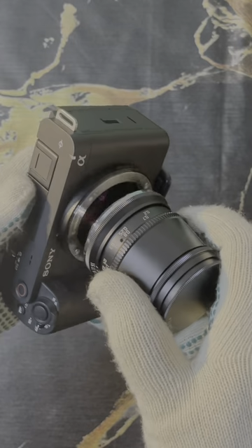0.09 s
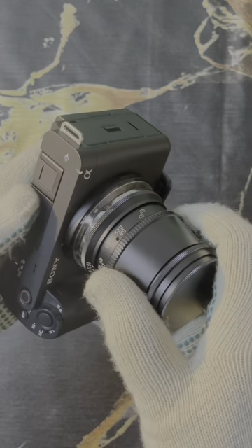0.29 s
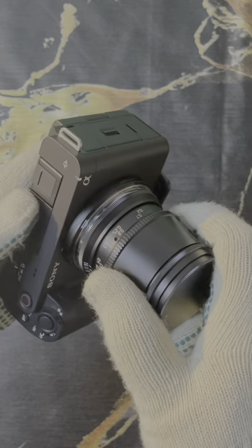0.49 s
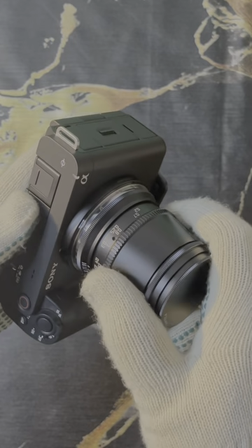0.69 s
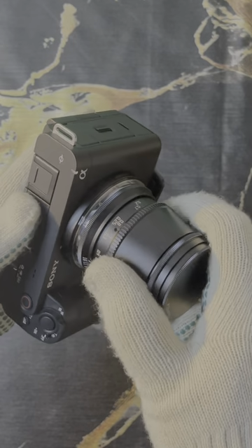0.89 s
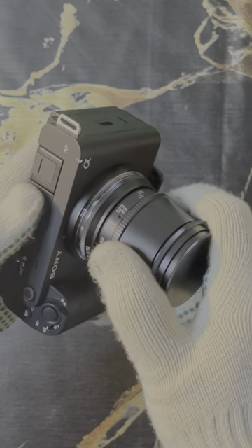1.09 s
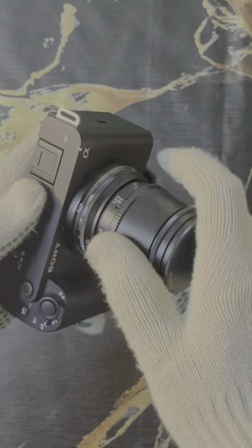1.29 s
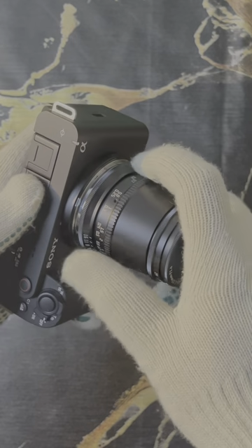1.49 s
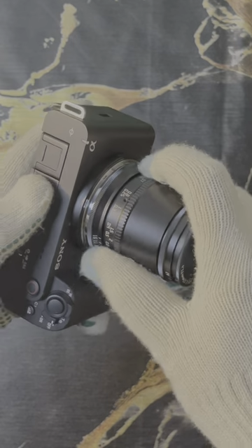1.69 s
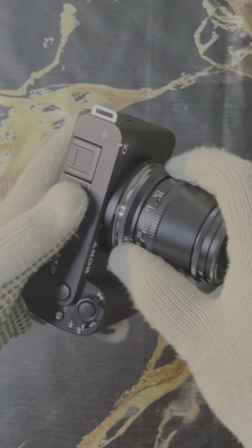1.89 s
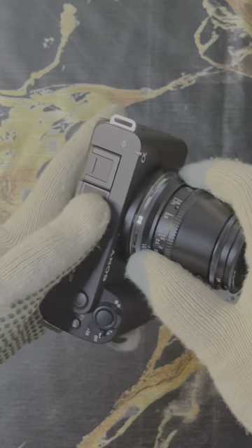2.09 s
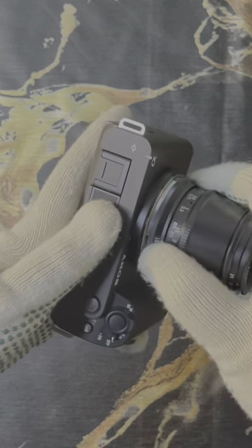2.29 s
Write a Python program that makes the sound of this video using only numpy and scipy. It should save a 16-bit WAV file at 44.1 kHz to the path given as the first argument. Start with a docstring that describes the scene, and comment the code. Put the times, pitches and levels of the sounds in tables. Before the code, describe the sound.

Lens mount clicks, close up: soft rubbing leads into quick hard knocks, then a quiet gap, a softer click pair with a short scrape, and faint closing taps, over unsteady low hum and faint hiss indoors.

```python
"""A low swaying hum and a hiss come first, with a brief glove rub; knocks and clicks soon follow.
Gloved hands seat and twist a metal lens on a camera body, close to a pair of microphones.
Each blow excites damped modes of mount and body and a broad crack; each rub is granular friction noise.
A small room answers with decaying random taps; hum and hiss are shaped noise, partly alike in both channels."""
import sys
import numpy as np
from scipy import signal
from scipy.fft import rfft, irfft
from scipy.io import wavfile
from scipy.ndimage import uniform_filter1d

SR = 44100
rng = np.random.default_rng(int(sys.argv[2]) if len(sys.argv) > 2 else 0)


def inscribe(sig):
    """Save sig as 16-bit PCM at rate SR to the path in sys.argv[1].

    A 1-D sig is mono; a 2-D sig holds one channel per row.
    Samples are clipped to [-1, 1] before scaling.
    """
    pcm = np.round(np.clip(np.atleast_2d(sig).T, -1, 1) * 32767)
    wavfile.write(sys.argv[1], SR, pcm.astype(np.int16))


N = 105840  # samples

HUM_DB, HISS_DB = -53.5, -78  # RMS over both channels, ahead of the final filters
GRAINS_PER_S = 3600  # mean rate of friction grains
GRAIN_DB = -5.5  # scale of the exponential spread of grain levels
WHISTLE_OCT, FAVOUR_OCT = 0.14, 0.066  # widths of the favoured bands of rubs and blows, octaves
ROOM_DB, ROOM_RIGHT_DB = -1.5, 1.5  # room gain; extra on the right
ROOM_GAP_S = 0.0035  # silence ahead of the first room tap
ROOM_SAME = 0.15  # share of the room taps that both channels hear alike
HIT_DB, CRACK_DB = -4.5, 10  # common gain of all blows; crack beside the modes
SCATTER_DB = 2  # chance in how strongly each blow finds each mode
DETUNE = 0.0046  # relative spread of mode frequencies, as the grip shifts them at each blow
CRACK_THIN_DB = -4.5  # the crack thins out toward the bass
RING_SEND_DB, CRACK_SEND_DB = -11.5, 12.5  # body ring and crack sent to the room
LAG_S = -.0001  # delay of the left channel: negative, as that microphone is nearer the lens
RUMBLE_CUT_HZ, EDGE_HZ = 36.5, 17000  # lower and upper band limits


def gain_of(db):
    """Amplitude ratio, by the definition of the decibel."""
    return 10 ** (np.asarray(db) / 20)


def evened(x):
    """Normalization to unit RMS, the square root of mean power."""
    return x / np.sqrt(np.mean(x ** 2) + 1e-20)


def read(points, hz):
    """Interpolation along a logarithmic frequency axis."""
    f, value = np.transpose(points)
    return np.interp(np.log(hz + 1), np.log(f + 1), value)


def bump(hz, centre_hz, db, octaves):
    """Gaussian resonance curve over log frequency, in dB."""
    return db * np.exp(-.5 * (np.log2(hz / centre_hz + 1e-9) / octaves) ** 2)


def coloured(x, db_of):
    """Linear filtering: the spectrum is multiplied by a gain in dB given as a function of frequency."""
    n = x.shape[-1]
    return irfft(rfft(x) * gain_of(db_of(np.fft.rfftfreq(n, 1 / SR))), n)


def add(mix, s, sound):
    """Superposition: sounds add linearly from time s; what falls outside the mix is dropped."""
    at = round(s * SR)
    sound = sound[:, max(-at, 0):]
    part = mix[:, max(at, 0):][:, :sound.shape[1]]
    part += sound[:, :part.shape[1]]


def steady(spectrum, level_db, sway_share):
    """Partially coherent Gaussian noise of a given spectrum, its bass swelling and sinking by a share."""
    # Left-right likeness: (frequency [Hz], share [1])
    likeness = [(60, 0.97), (120, 0.84), (250, 0.78), (550, 0.13), (1650, 0.14), (5000, 0.17),
                (15000, 0.14)]
    # Left-right balance: (frequency [Hz], left minus right [dB])
    balance = [(60, 2.5), (240, 2.5), (950, 1), (3770, 6), (15000, 0)]
    # Bass level, of which only the departure from the mean counts: (time [s], level [dB])
    bass_level = [(0.0, -58.5), (0.549, -52), (0.849, -55), (1.12, -51), (1.14, -60), (1.27, -51.5),
                  (1.4, -57), (1.421, -56.5), (1.859, -55.5), (1.93, -69), (1.991, -54), (2.3, -52.5),
                  (2.38, -67)]
    frames, hz = N // 512 + 9, np.fft.rfftfreq(4096, 1 / SR)
    a, b, c, d = rng.standard_normal((frames, 2049, 4)).T
    left, other = a + 1j * b, c + 1j * d
    same = np.clip(read(likeness, hz), -1, 1)[:, None]
    z = np.array([left, same * left + np.sqrt(1 - same ** 2) * other])
    s, db = np.transpose(bass_level)
    sway = np.interp(np.arange(frames) * 512 / SR, s, db - db.mean())
    sway = sway_share * sway * (hz < 150)[:, None]
    lean = np.array([.5, -.5])[:, None, None] * read(balance, hz)[:, None]
    z *= gain_of(read(spectrum, hz)[:, None] + sway + lean)
    noise = signal.istft(z, nperseg=4096, noverlap=3584)[1][:, :N]
    return gain_of(level_db) * evened(noise)


def rub(s, rise, hold, fall, level_db, tilt_db, whistle_hz, whistle_db):
    """Granular friction: dense random micro-slips under a rise, hold and fall. Rows: left, right, room."""
    # Friction spectrum: (frequency [Hz], relative density [dB per Hz])
    friction_spectrum = [(300, -4), (900, 2.5), (2000, 0.2), (4000, -0.5), (7000, -8.5), (9000, -3.5),
                         (10000, -19), (13000, -14.5)]
    t = np.arange(8192) / SR
    grains = gain_of(GRAIN_DB * rng.exponential(1, 8192)) * (rng.random(8192) < GRAINS_PER_S / SR)
    right_only = rng.standard_normal((3, 8192)) * [[0], [.5], [0]]
    noise = right_only + rng.standard_normal(8192)
    noise *= uniform_filter1d(grains, 12) + 0.013  # a faint floor between grains

    def colour(f):
        tilt = tilt_db * np.log2(f / 2000 + 0.0041)
        return read(friction_spectrum, f) + tilt + bump(f, whistle_hz, whistle_db, WHISTLE_OCT)

    noise = coloured(noise, colour)
    decay_db = -20 * np.maximum(t - rise - hold, 0) / fall
    shape = np.clip(t / rise, 0, 1) ** 2 * gain_of(decay_db)
    return s, gain_of(level_db) * shape * evened(noise) * [[1], [1], [.4]]


def room(x):
    """Reverberation: convolution with random-sign taps, each band decaying at its own speed."""
    # Reverberation time: (frequency [Hz], t60 [s])
    band_t60 = [(300, 0.63), (700, 0.18), (1500, 0.42), (4000, 0.3), (8000, 0.31), (12000, 0.18)]
    # Colour of the reverberation: (frequency [Hz], gain [dB])
    room_colour = [(300, 16), (800, 8.5), (2000, 1), (5000, -4.5), (9500, -10), (10100, -30), (13000, -6)]
    taps = np.zeros((2, SR // 2))
    at = np.arange(int(ROOM_GAP_S * SR), SR // 2 - 40, 10)
    at = at + rng.integers(0, 10, (2, 2300))[:, :len(at)]
    signs = rng.choice([-1., 1.], (2, 2300))[:, :at.shape[1]]
    np.put_along_axis(taps, at, signs, 1)
    same = np.clip(ROOM_SAME, 0, 1)
    taps[0] = same * taps[1] + np.sqrt(1 - same ** 2) * taps[0]
    hz, t, z = signal.stft(taps, SR, nperseg=256)
    decay = gain_of(-60 * t / read(band_t60, hz)[:, None])
    tail = signal.istft(z * decay, SR, nperseg=256)[1]
    tail = coloured(tail / np.linalg.norm(tail[0]), lambda f: read(room_colour, f))
    answer = signal.fftconvolve(x[None], tail, axes=1)[:, :len(x)]
    return answer * gain_of([[ROOM_DB], [ROOM_DB + ROOM_RIGHT_DB]])


def hit(s, level_db, body_db, mount_db, bright_db, contact_ms, favour_hz, favour_db, pan_db, ring_share):
    """Modal excitation: a rattle of contacts rings damped modes and cracks. Rows: left, right, room."""
    # Modes of body and mount: (frequency [Hz], left level [dB], right level [dB], t60 before damping [s])
    modes = [(404.6, -22, -12.5, 0.36), (515.7, -13, -2, 0.099), (657.3, -3, -7, 0.054),
             (842, 3.5, -0.5, 0.053), (924, -2, -2.5, .028), (1020, 0.5, -3, 0.044), (1298, 0, 1, 0.022),
             (1500, 4, -5.5, 0.023), (1690, -12, -6.5, 0.016), (1840, -26, 0.5, 0.027),
             (2140, 7, -19, 0.01), (2643, -0.5, 3, 0.021), (3140, -7.5, -0.5, 0.023), (4200, 4, 5, 0.007),
             (4710, 10.5, 14, 0.0042), (5550, 2.5, 4, 0.0095), (5950, 5, -4.5, 0.0053),
             (7920, -11, -3, 0.015), (8970, -10.5, 0, 0.0044), (12250, -13, -15.5, 0.0026)]
    t = np.arange(6000) / SR
    hz, left_db, right_db, t60 = np.transpose(modes)[:, :, None]
    hz = hz * (1 + DETUNE * rng.standard_normal(hz.shape))

    def zone(f):
        return read([(1000, body_db), (1250, mount_db), (3000, mount_db), (3800, bright_db)], f)

    scatter = SCATTER_DB * rng.standard_normal(hz.shape)
    colour = zone(hz) + bump(hz, favour_hz, favour_db, FAVOUR_OCT) + scatter
    decay_db = -60 * t / (t60 * max(ring_share, .1))
    ring = gain_of(colour + decay_db) * np.sin(2 * np.pi * (hz * t + rng.random(hz.shape)))

    contacts = t * 1000 / max(contact_ms, .1)  # time in units of the contact time
    swung = ring * (1 - np.exp(-contacts)) ** 2  # the heavy body swings up smoothly
    u = contacts[:1000]
    force = rng.choice([-1., 1.], 1000) * (rng.random(1000) < .4) * u * np.exp(-u)
    force /= np.linalg.norm(force)
    driven = signal.fftconvolve(ring, force[None], axes=1)[:, :6000]
    # every mode gets its full share of energy, whatever the force spectrum
    share = np.linalg.norm(ring, axis=1) / np.linalg.norm(driven, axis=1)
    ring = np.where(hz < 1100, swung, driven * share[:, None])

    room_db = left_db + RING_SEND_DB - 99 * (hz > 1100)  # only the body modes reach the room
    out = np.array([(gain_of(db) * ring).sum(0) for db in (left_db, right_db, room_db)])
    impulse = 1. * (np.arange(512) == 0)
    crack = coloured(impulse, lambda f: zone(f) + read([(450, CRACK_THIN_DB), (900, 0.0019)], f))
    crack = gain_of(CRACK_DB) * np.roll(crack, 40)  # room for the part ahead of its peak
    out[:2, :1511] += np.convolve(crack, force)
    out[2, :512] += gain_of(CRACK_SEND_DB) * crack
    pan = np.array([[pan_db / 4], [-pan_db / 4], [0]])
    return s - 40 / SR, gain_of(level_db + HIT_DB + pan) * out


def scene():
    """Superposition of blows, rubs and room through one passband, over steady hum and hiss."""
    # Hum spectrum: (frequency [Hz], relative density [dB per Hz])
    hum_spectrum = [(15, -49), (27, -17), (41, -5), (50, -1.5), (61, 2.5), (78, -10), (105, -3.5),
                    (125, -16.5), (140, -19.5), (190, -19), (230, -20.5), (336, -28), (400, -32),
                    (520, -79.5)]
    # Hiss spectrum: (frequency [Hz], relative density [dB per Hz])
    hiss_spectrum = [(240, -39), (400, -6.5), (583, -3), (1240, -14), (2300, -18), (4200, -22.5),
                     (5240, -19), (7050, -23.5), (9200, -21), (9800, -24.5), (10200, -49), (10700, -31.5),
                     (12500, -31.5), (13200, -40), (17000, -55)]
    # Glove and flange rubs: (start [s], rise [s], hold [s], time to fall 20 dB [s],
    # level before the envelope and passband [dB], treble tilt [dB per octave],
    # favoured frequency [Hz], favour [dB])
    rubs = [(-.03, 0.0032, 0.0064, 0.086, -71.5, 0.5, 4830, 6),
            (0.079, 0.0056, 0.0097, 0.011, -63.5, -4.5, 850, 14),
            (0.094, 0.0058, .028, .006, -71.5, 0.5, 4780, 16),
            (0.08, 0.031, 0.017, 0.0061, -72, -2, 2600, 14),
            (0.241, 0.01, 0.017, 0.069, -72.5, -7.5, 1840, 30),
            (0.245, 0.017, 0.054, 0.036, -72.5, -1, 795, 34),
            (0.625, 0.027, 0.031, 0.037, -54.5, -5.5, 9200, 12),
            (0.694, 0.0075, 0.032, 0.053, -83, 6, 9100, 12),
            (1.076, 0.023, 0.028, 0.084, -78, 1.5, 4100, 1.5),
            (1.173, 0.0033, 0.0071, 0.07, -68, -2, 3560, 10),
            (1.184, 0.015, 0.0047, 0.012, -45, -3.5, 1500, -8),
            (1.217, 0.0041, 0.033, 0.086, -54, -3.5, 407, 5),
            (1.416, 0.0088, 0.013, 0.029, -79, 3, 9040, 3.5), (1.694, 0.023, 0.039, 0.033, -73, 4, 9170, 4),
            (2.222, 0.019, 0.018, 0.048, -69, -4, 1500, 0),
            (2.269, 0.0078, 0.01, 0.036, -63, -3.5, 1290, 10.5),
            (2.299, 0.018, 0.12, 0.039, -78.5, -0.1, 9300, 3.5)]
    # Blows: (time [s], level before the common gain [dB], body below about 1.2 kHz [dB],
    # mount to about 3.5 kHz [dB], bright part above [dB], contact time [ms], favoured frequency [Hz],
    # favour [dB], twice the left minus right level [dB], ring length as the gloves damp it [share of t60])
    hits = [(0.15, -44.5, -6.5, -4.5, -7.5, 1.94, 4930, 7.5, 3, 0.88),
            (0.2084, -33, -13, -16, -27, 1.45, 844, 18, -4, 0.75),
            (0.3055, -37, -11.5, -7.5, -16.5, 1.25, 837, 13.5, 5, 0.76),
            (.312, -33.5, -2.5, -9.5, -12.5, 1.33, 864, 10, 2, 0.4),
            (0.335, -46, -6, 3.5, -4, 2.6, 890, 18, 4, 0.49),
            (0.3529, -21, -15, -15, -12.5, 0.99, 1402, 28, -2, 0.91),
            (0.3645, -26.5, -7.5, -5, -6.5, 1.4, 1066, 10.5, 9.5, 0.6),
            (0.3667, -29, -5, -8.5, -16, 1.7, 998, 14, -3.5, 0.86),
            (.379, -37.5, -3.5, -9, -16, 0.9, 947, 3, 3, 1),
            (0.628, -62, -8, -5.5, -15, 2.1, 2160, 13, -15, 0.73),
            (0.648, -56.5, 2, -3.5, -5, 2.9, 1480, 4, -3, 0.69),
            (.661, -59.5, -10, 6.5, -4, 1.4, 3500, 2, 11, 0.36),
            (.670, -42.5, -8.5, -9, -10, 1.74, 1280, 13, 2.5, 0.78),
            (1.1969, -34.5, -12.5, -7, -11.5, 1.1, 844, 12, 1.5, .8),
            (1.205, -30, -8.5, -12.5, -11, 2.33, 2140, 13.5, -3, 1.3),
            (1.272, -46, -10, -4, -4, 2.2, 850, 0, -1, .5),
            (1.757, -62, -28, -22, -28, 1.6, 1690, 30, 2, 1.2),
            (2.256, -42, 1.5, -6, -13, 1.9, 890, 7, 8, 0.21),
            (2.279, -40.5, -36, -9, -10.5, 8.2, 1300, 2, -2, 0.7),
            (2.293, -51.5, 2, -17, -22.5, 4.6, 2140, 6, -27, 0.76)]
    # Passband of the close sounds: (frequency [Hz], gain [dB])
    passband = [(200, -11.5), (330, -4), (400, 1.9), (9600, 8), (10200, -3.5), (11000, 8.5), (12500, -6),
                (13300, -31), (15000, -8), (16500, -22)]
    # Balance of the close sounds: (frequency [Hz], left minus right [dB])
    shade = [(300, 0.3), (700, 6.5), (1300, 4.5), (2400, 2), (4400, 12), (8000, 4.5), (14000, -1)]
    near = np.zeros((3, N + 8192))  # left, right, room send
    for row in hits:
        add(near, *hit(*row))
    for row in rubs:
        add(near, *rub(*row))
    sides = np.array([[.5], [-.5]])
    close = near[:2] + room(near[2])
    close = coloured(close, lambda f: read(passband, f) + sides * read(shade, f))[:, :N]
    hum = steady(hum_spectrum, HUM_DB, sway_share=0.83)
    hiss = steady(hiss_spectrum, HISS_DB, sway_share=0)
    left, right = close + hum + hiss
    left = np.interp(np.arange(N) - round(LAG_S * SR), np.arange(N), left)
    return np.array([left, right])


def record(dry):
    """Band limitation: a high-pass removes rumble and a linear-phase low-pass sets the upper edge."""
    high_pass = signal.butter(4, RUMBLE_CUT_HZ, "high", fs=SR, output="sos")
    low_pass = signal.firwin(511, EDGE_HZ, window=("kaiser", 9), fs=SR)
    cut = signal.sosfilt(high_pass, dry)
    return signal.oaconvolve(cut, low_pass[None], "same")


dry = scene()
out = record(dry)
inscribe(out)
```